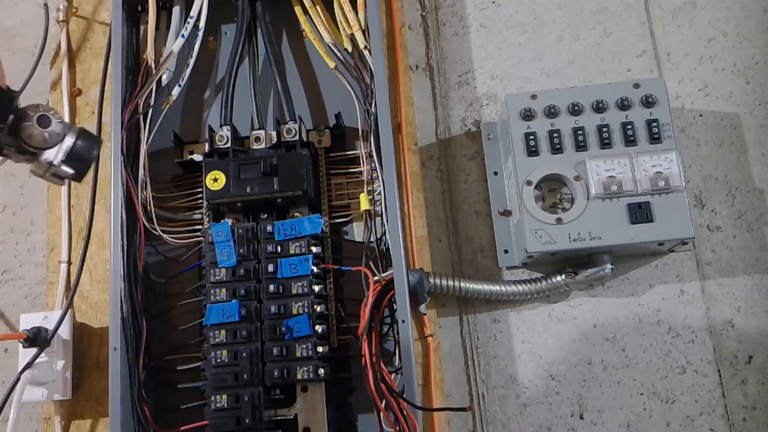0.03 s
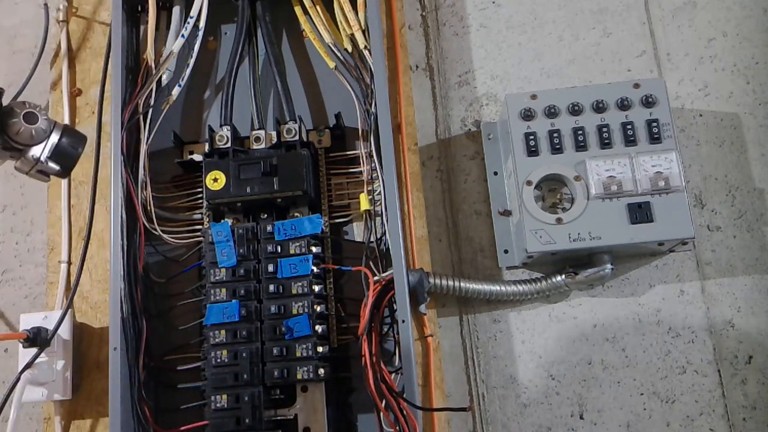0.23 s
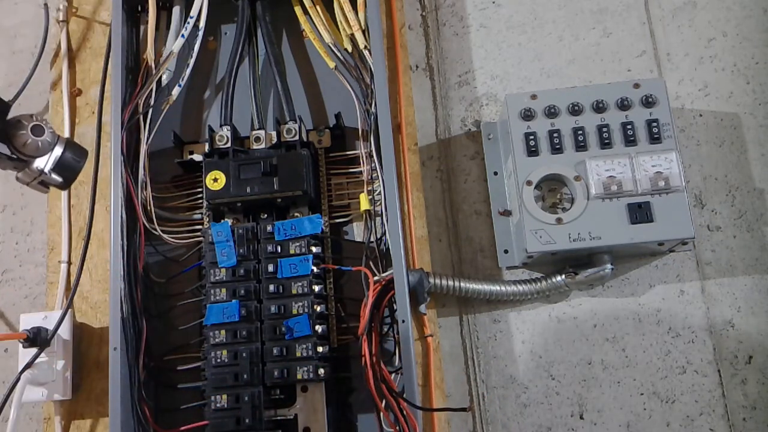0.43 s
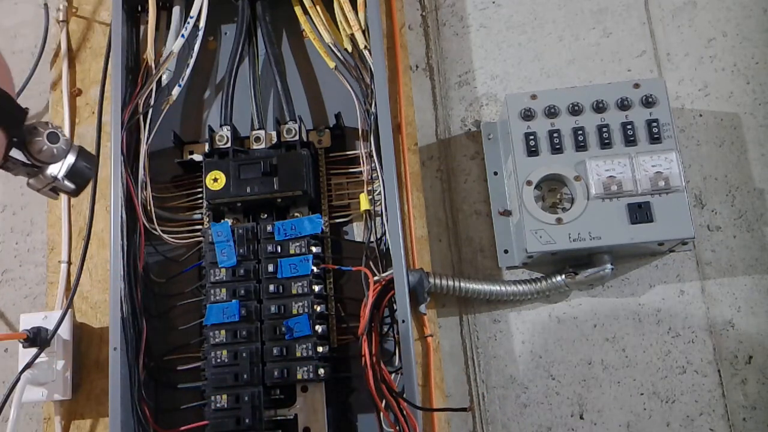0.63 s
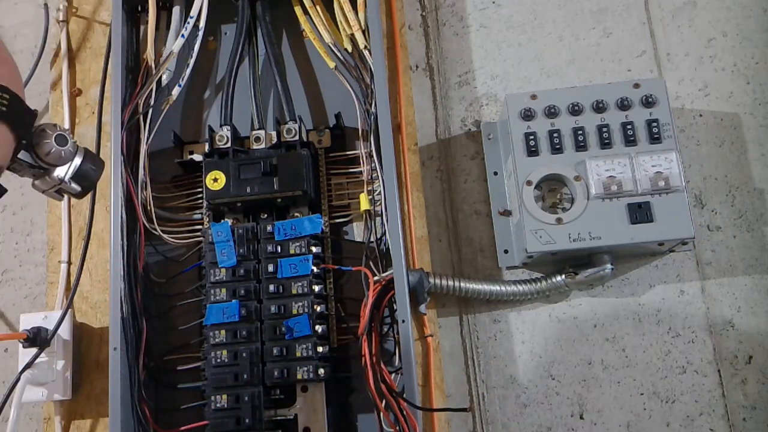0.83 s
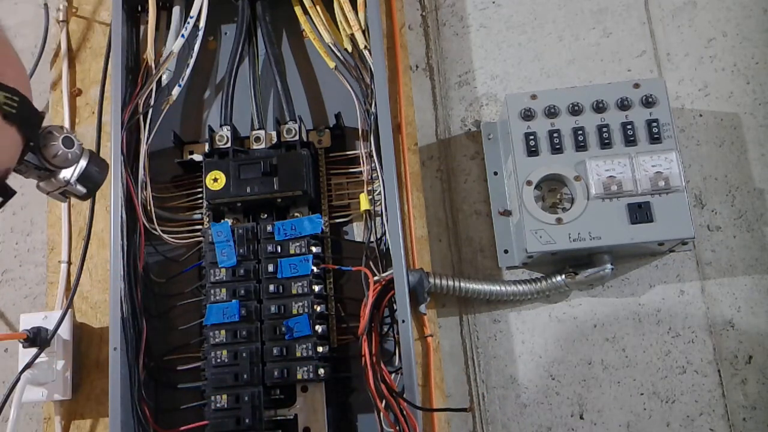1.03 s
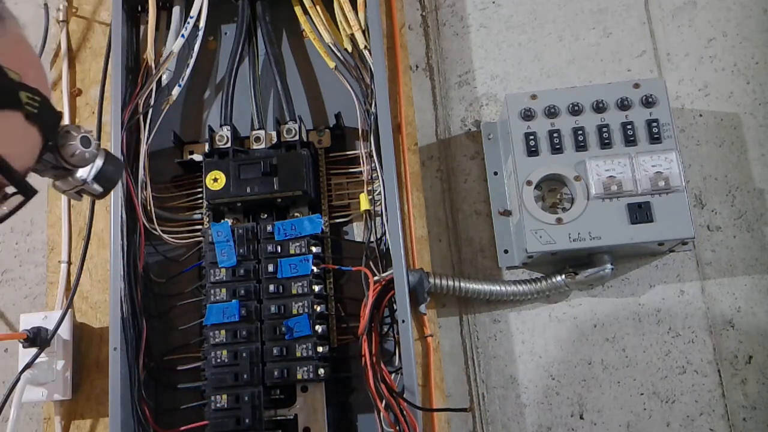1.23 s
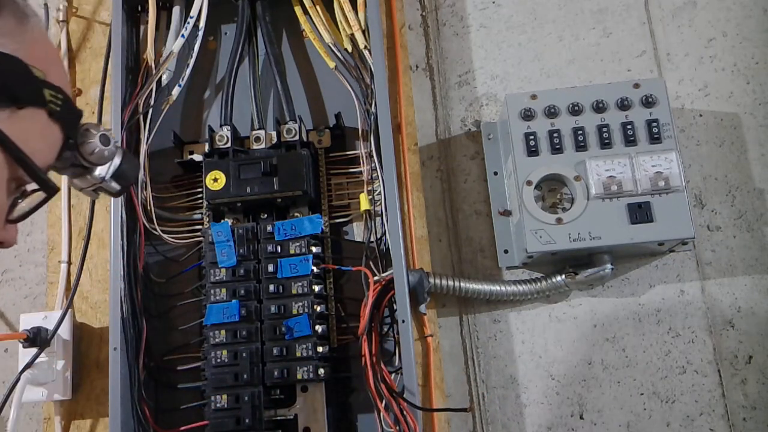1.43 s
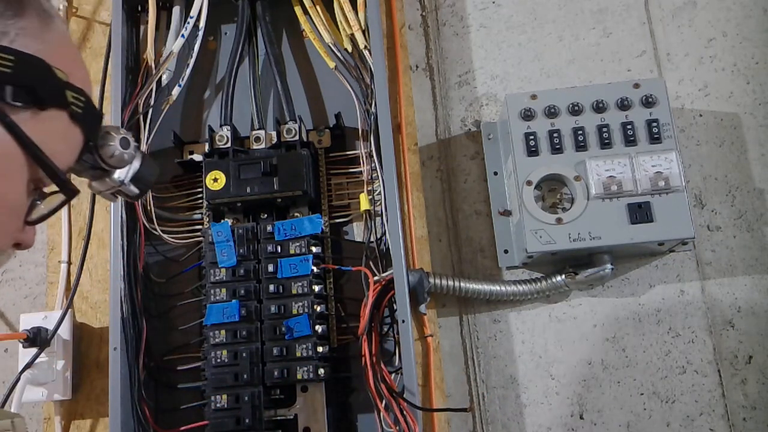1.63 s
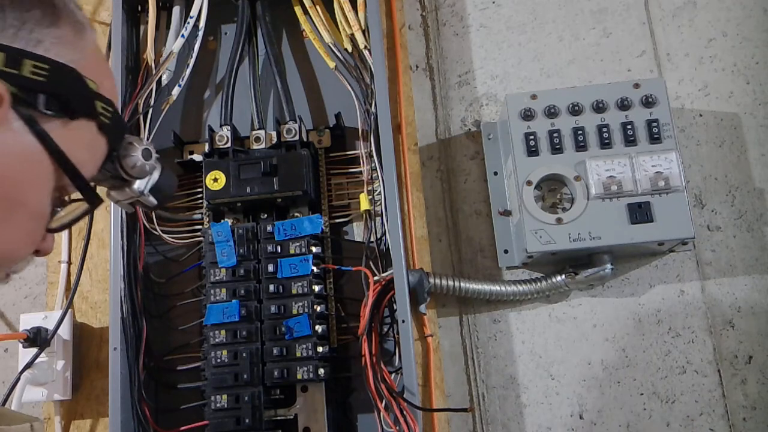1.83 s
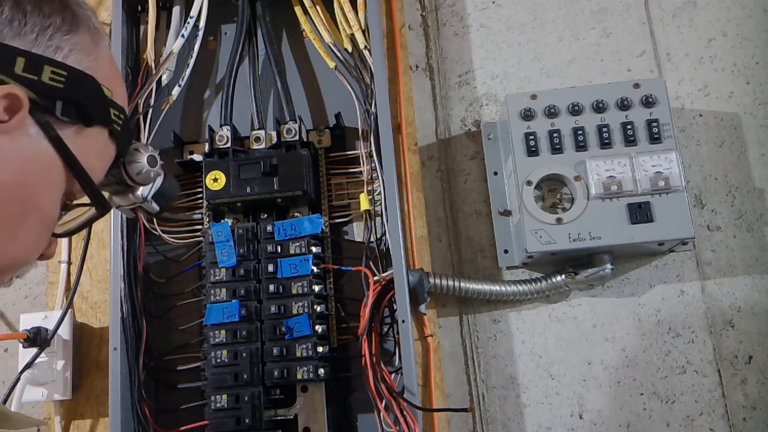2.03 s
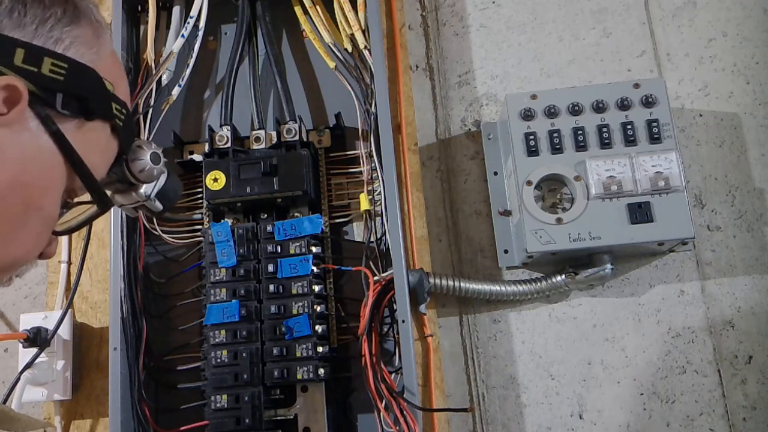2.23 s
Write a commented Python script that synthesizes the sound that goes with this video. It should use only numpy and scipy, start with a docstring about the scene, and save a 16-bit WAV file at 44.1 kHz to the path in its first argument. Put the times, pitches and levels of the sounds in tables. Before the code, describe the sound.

A stiff circuit breaker snaps over in a steel electrical panel, rattles and rubs lightly under a hand, then snaps back a second later. Each snap rings briefly in a small concrete room over faint hiss.

```python
"""In a small concrete room, a stiff spring-loaded switch, probably a breaker, snaps over in a steel
electrical panel, rattles as it is handled, and snaps back. Each snap is a few quick impacts that excite
the cabinet's damped modes and leave a short reverberant tail. A faint steady hiss lies underneath,
and the microphone cuts two notches in the treble."""
import sys
import numpy as np
from scipy import signal
from scipy.fft import rfft, irfft, next_fast_len
from scipy.io import wavfile
from scipy.ndimage import uniform_filter1d

SR = 44100
rng = np.random.default_rng(int(sys.argv[2]) if len(sys.argv) > 2 else 0)


def unload_wav(signal):
    """Save mono or channel-first audio to the path in sys.argv[1] as 16-bit WAV at rate SR, clipped to [-1, 1]."""
    wavfile.write(
        sys.argv[1],
        SR,
        np.round(np.clip(np.atleast_2d(signal).T, -1, 1) * 32767).astype(np.int16),
    )


N = 105840
EVENT_TIME_S = np.arange(SR // 2) / SR
ATTACK_S = 0.00039


def amp(db):
    """Decibel scale: 20 dB is a factor of ten in amplitude."""
    return 10 ** (np.asarray(db) / 20)


def unit(x):
    """Normalisation to an rms of 1."""
    return x / np.sqrt(np.mean(x ** 2) + 1e-20)


def along(points, hz):
    """Interpolation of (frequency_hz, value) points on a logarithmic frequency axis."""
    point_hz, values = np.transpose(points)
    return np.interp(np.log(hz + 1), np.log(point_hz + 1), values)


def decay(t, t60):
    """Exponential damping: 60 dB in t60 seconds."""
    return np.exp(-np.log(1000) * t / t60)


def add(track, start_s, sound):
    """Superposition: a sound sums into the track from start_s on."""
    part = track[round(start_s * SR):][:len(sound)]
    part += sound[:len(part)]


def coloured(x, spectrum, tilt=0):
    """Minimum-phase filtering at unit power gain; tilt is in dB per octave about the mids."""
    size = 2 * next_fast_len(len(x))
    hz = np.fft.rfftfreq(size, 1 / SR)
    octaves = np.log2(np.clip(hz, 400, 8000) / 2000)
    gain = unit(amp(along(spectrum, hz) + tilt * octaves))
    cepstrum = irfft(np.log(gain), size)
    cepstrum[1:size // 2] *= 2  # folding the cepstrum makes the filter causal
    cepstrum[size // 2 + 1:] = 0
    return irfft(rfft(x, size) * np.exp(rfft(cepstrum)), size)[:len(x)]


# spectrum of the noise floor: frequency_hz, relative_db
HISS_SPECTRUM = [(25, -5.5), (60, -8.5), (150, -9.5), (400, -9.5), (900, -9), (1350, 1), (1650, -1),
                 (2050, 2), (2550, -2.5), (3000, -2), (4000, -15.5), (5200, -23), (7200, -32),
                 (9000, -34.5), (11000, -28.5), (15500, -33)]
# its slow drift: time_s, level_db
HISS_ENVELOPE = [(0, -50.5), (.22, -51), (.55, -51.5), (1.5, -53), (2.4, -53)]

def hiss():
    """Broadband noise: the room and microphone set a nearly constant noise floor."""
    level_db = np.interp(np.arange(N) / SR, *np.transpose(HISS_ENVELOPE))
    noise = coloured(rng.standard_normal(N + SR // 2), HISS_SPECTRUM)[-N:]
    return amp(level_db) * unit(noise)


def ring(modes):
    """Free vibration: struck steel sounds a sum of damped modes, here with random phases."""
    t = EVENT_TIME_S
    tones = sum(amp(db) * decay(t, t60) * np.sin(2 * np.pi * (hz * t + rng.random()))
                for hz, db, t60 in modes)
    return tones * (1 - np.exp(-t / ATTACK_S))


# knocks of the hand: start_s, level_db
HAND_BUMPS = [(.132, -51.5), (.7355, -44), (1.221, -46.5)]
# low cabinet modes: pitch_hz, relative_db, t60_s
LOW_MODES = [(427, -14.5, 0.23), (559, -9, 0.25), (637, -1.5, 0.2), (820, -12, 0.29)]

def bumps():
    """Soft impact: the hand excites only the cabinet's low modes, so they sound dull."""
    out = np.zeros(N)
    for start_s, db in HAND_BUMPS:
        add(out, start_s, amp(db) * ring(LOW_MODES))
    return out


# strokes of the hand: start_s, length_s, level_db
RUB_STROKES = [(0, 0.35, -56), (.42, 0.11, -55), (0.542, 0.055, -57), (0.643, 0.08, -40.5),
               (0.879, 0.37, -62.5)]
# friction spectrum: frequency_hz, relative_db
RUB_SPECTRUM = [(300, -26), (900, -10), (1400, 6.5), (2100, -6), (3000, 1.5), (4200, -9), (5500, -18),
                (7300, -14), (9000, -23), (15000, -37)]

def rubbing(grain_s=0.003, grain_db=2):
    """Sliding friction: the hand gripping the switch makes grainy noise that swells and fades."""
    out, t = np.zeros(N), EVENT_TIME_S
    for start_s, length_s, db in RUB_STROKES:
        grain = unit(uniform_filter1d(rng.standard_normal(len(t)), round(grain_s * SR)))
        stroke = np.sin(np.pi * np.clip(t / length_s, 0, 1))
        friction = stroke * amp(grain_db * grain) * rng.standard_normal(len(t))
        add(out, start_s, amp(db) * coloured(friction, RUB_SPECTRUM))
    return out


# reverberation time of the room: frequency_hz, t60_s
ROOM_DECAY = [(150, 0.073), (700, 0.43), (2000, 0.41), (5000, .33), (8000, 0.34), (14000, 0.17)]

def room_tail(rise_s=0.0027):
    """Reverberation: a diffuse field builds up, then dies away at a different rate in each band."""
    t = EVENT_TIME_S
    hz, frame_s, bands = signal.stft(rng.standard_normal(len(t)), SR, nperseg=256)
    bands *= decay(frame_s, along(ROOM_DECAY, hz)[:, None])
    tail = signal.istft(bands, SR, nperseg=256)[1][:len(t)]
    return tail * (1 - np.exp(-t / rise_s))


def clatter(t60, room_db, rise_s=ATTACK_S):
    """Modal overlap: one contact's dense modes merge into a noise burst, followed by the room's tail."""
    t = EVENT_TIME_S
    burst = rng.standard_normal(len(t)) * decay(t, t60) * (1 - np.exp(-t / rise_s))
    return burst + amp(room_db) * room_tail()


# contacts of the loose parts: start_s, relative_db, tilt_db_per_octave
RATTLE_CONTACTS = [(0.5834, -25.5, -4.5), (0.5902, -26.5, 0), (0.6047, -19, 0), (.631, -24.5, -0.5),
                   (0.687, -20.5, 2), (0.695, -19, 3), (0.7021, -14.5, 1.5), (0.718, -23, 1.5),
                   (.7305, -20.5, -0.5), (0.7359, -21.5, 4.5), (0.755, -32, -1.5), (.779, -27, -7),
                   (0.787, -18, 0), (0.7989, -22.5, -1.5), (0.8039, -24, 2), (0.839, -36.5, -9.5),
                   (0.928, -33, 2), (0.942, -33, 2.5), (0.9534, -31.5, -0.5), (.986, -39.5, -0.5),
                   (1.0294, -35.5, 4), (1.0385, -41, 3), (1.107, -49, 1.5), (1.1928, -35.5, -4.5),
                   (1.2013, -39.5, 0), (1.2125, -33, -0.5), (1.22, -38, 0), (1.2311, -27.5, 0.5),
                   (1.2366, -28, 1)]
# their clatter spectrum: frequency_hz, relative_db
RATTLE_SPECTRUM = [(100, -43), (400, -27.5), (720, -15), (960, -3.5), (1150, -1.5), (1400, -0.5),
                   (1620, -0.5), (2100, 1), (2450, -1), (2750, -0.5), (3150, -1.5), (3800, -12.5),
                   (5500, -20.5), (7200, -24), (8800, -30), (11500, -36), (16000, -49)]
# the modes they excite: pitch_hz, relative_db, t60_s
RATTLE_RESONANCES = [(957, -8.5, 0.14), (1107, -4.5, 0.062), (1312, -6.5, 0.072), (1400, 0.5, 0.18),
                     (1695, -9, 0.28), (2190, -9.5, 0.32), (2820, -5.5, 0.2)]

def rattle(ring_db=-10.5):
    """Light impacts: loose parts tick against each other between the snaps and ring briefly."""
    out = np.zeros(N)
    for start_s, db, tilt in RATTLE_CONTACTS:
        tick = coloured(clatter(t60=0.054, room_db=-11.5, rise_s=0.0015), RATTLE_SPECTRUM, tilt)
        add(out, start_s, amp(db - 4) * (tick + amp(ring_db) * ring(RATTLE_RESONANCES)))
    return out


# impacts of each snap, with relative levels: start_s, clatter_db, t60_s, crack_db, thump_db
FIRST_CONTACTS = [(.2456, -4.5, 0.036, -13.5, -8.5), (.2513, -6.5, 0.041, -15, -20),
                  (.2588, -15.5, 0.094, -22, -35)]
RETURN_CONTACTS = [(1.2485, -14, 0.056, -14, -14.5), (1.2503, -8, 0.055, -22.5, -24),
                   (1.2605, -20.5, 0.069, -40, -26), (1.3015, -32, .04, -50, -60)]
# spectra of each snap's clatter and of the treble crack: frequency_hz, relative_db
FIRST_SPECTRUM = [(100, -30), (260, -21.5), (380, -16.5), (520, -15), (660, -6.5), (950, -16.5), (1230, -6),
                  (1500, -10), (1750, -5), (2100, -2), (2600, -10), (3050, -7), (4000, -16.5),
                  (5500, -23.5), (9000, -33), (16000, -60)]
RETURN_SPECTRUM = [(100, -41), (260, -42.5), (420, -14), (600, -5.5), (760, -12), (1050, -2.5), (1250, -6),
                   (1480, 1), (1720, -6.5), (2000, 3), (2450, -6), (2750, -2.5), (3000, 1.5), (3300, -7.5),
                   (3800, -12), (5500, -21), (9000, -32), (16000, -73)]
CRACK_SPECTRUM = [(1000, -63), (3500, 3), (5000, 6.5), (6300, -9), (7200, 4.5), (8500, -1.5), (10000, -1.5),
                  (13000, -7.5), (16000, -19)]
# cabinet modes excited by each snap: pitch_hz, relative_db, t60_s
FIRST_RESONANCES = [(526, -14, 0.2), (613, -7, 0.22), (681, -9, 0.36), (766, -10, 0.32), (1110, -6, 0.17),
                    (1248, -5, 0.18), (1370, -13, .2), (1780, -11, 0.35), (2110, -6, 0.18),
                    (2000, -3, 0.32), (2205, 6, 0.11), (2167, -0.5, 0.23), (2331, -12, .18),
                    (2990, -13, 0.47)]
RETURN_RESONANCES = [(623, -8, 0.15), (823, -11.5, 0.33), (1490, 4.5, 0.084), (1490, 0.5, 0.17),
                     (1970, -1, 0.25), (2270, -17, 0.17), (2720, -17, 0.12), (2980, 3, 0.18),
                     (3057, -1, .13), (3050, -2, .07), (3010, -31, .22)]

def snap(contacts, spectrum, modes, ring_db, room_db, thump_hz):
    """Impulsive excitation: the spring throws the mechanism against its stops, ringing the cabinet."""
    out, t = np.zeros(N), EVENT_TIME_S
    thump = np.exp(-t / 0.0022) * np.sin(2 * np.pi * thump_hz * t)  # low push of the cabinet
    for start_s, clatter_db, t60, crack_db, thump_db in contacts:
        body = coloured(clatter(t60, room_db), spectrum)
        crack = coloured(clatter(t60=0.049, room_db=-18.5), CRACK_SPECTRUM)
        add(out, start_s, amp(clatter_db - 6) * body)
        add(out, start_s, amp(crack_db - 15.5) * crack)
        add(out, start_s, amp(thump_db - 17.5) * thump)
    second_contact_s = contacts[1][0]
    add(out, second_contact_s, amp(ring_db) * ring(modes))
    return out


def scene():
    """Superposition: hiss, handling sounds and two snaps sum into one channel."""
    first = snap(FIRST_CONTACTS, FIRST_SPECTRUM, FIRST_RESONANCES,
                 ring_db=-21, room_db=-10, thump_hz=141)
    back = snap(RETURN_CONTACTS, RETURN_SPECTRUM, RETURN_RESONANCES,
                ring_db=-25.5, room_db=-9.5, thump_hz=149)
    return (hiss() + bumps() + rubbing() + rattle() + first + back)[None]


# dips in the microphone's response: centre_hz, width_hz
MICROPHONE_NOTCHES = [(6000, 2700), (8000, 1200)]

def record(dry):
    """Frequency response: the microphone applies two second-order notches and a band limit."""
    size = next_fast_len(N + SR // 2)
    hz = np.fft.rfftfreq(size, 1 / SR)
    response = hz < 15850
    for centre_hz, width_hz in MICROPHONE_NOTCHES:
        detuning = centre_hz ** 2 - hz ** 2
        response = response * detuning / (detuning + 1j * hz * width_hz)
    return irfft(rfft(dry, size) * response, size)[:, :N]


dry = scene()
out = record(dry)
unload_wav(out)
```